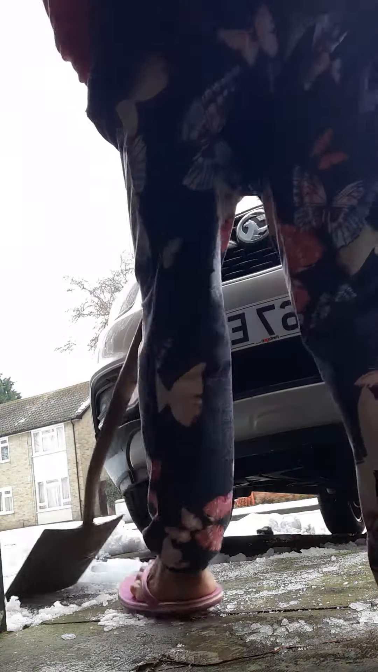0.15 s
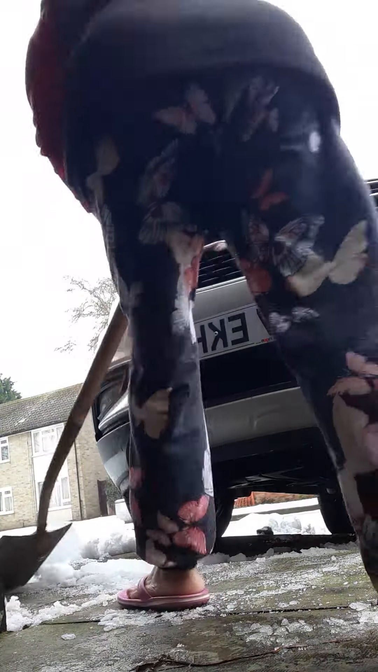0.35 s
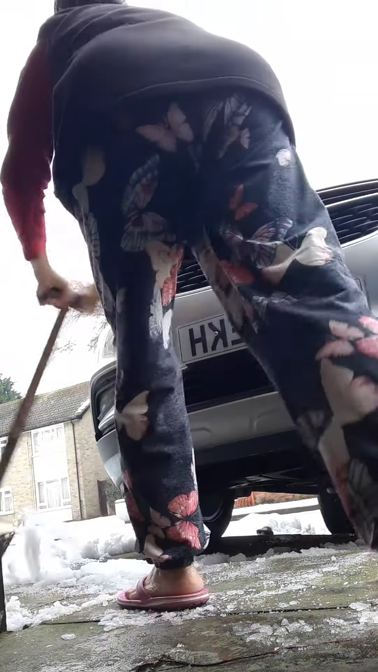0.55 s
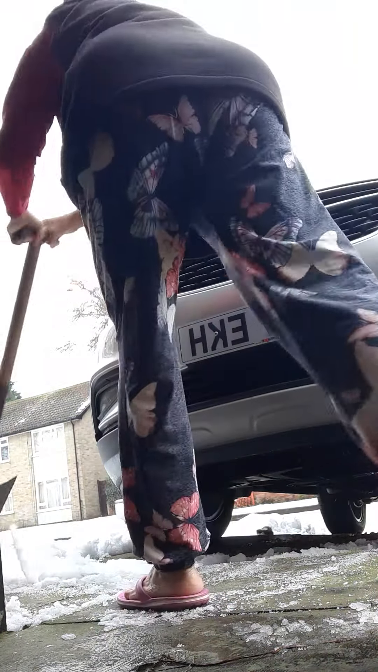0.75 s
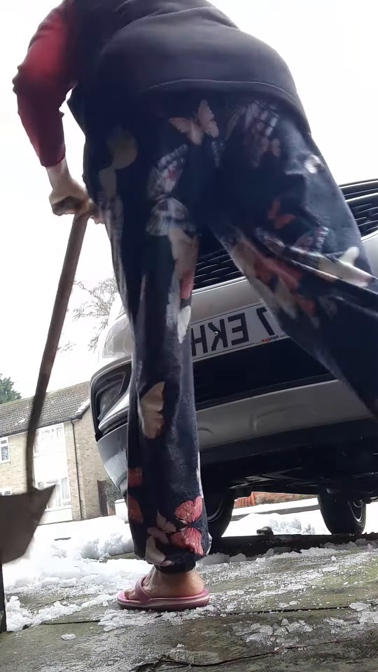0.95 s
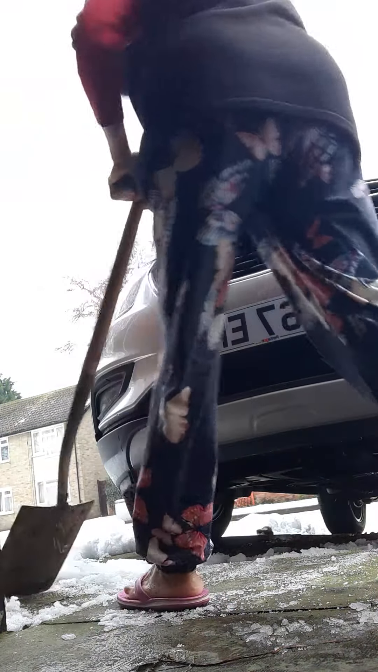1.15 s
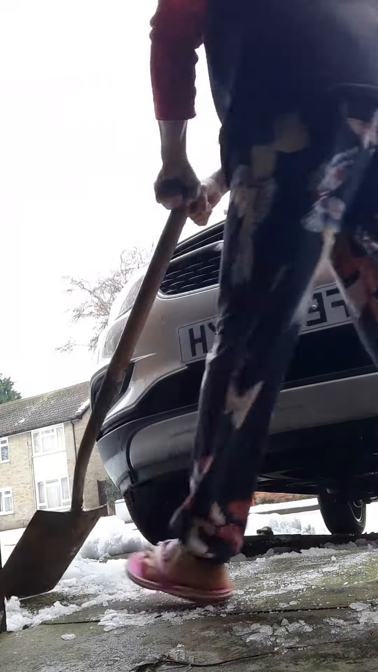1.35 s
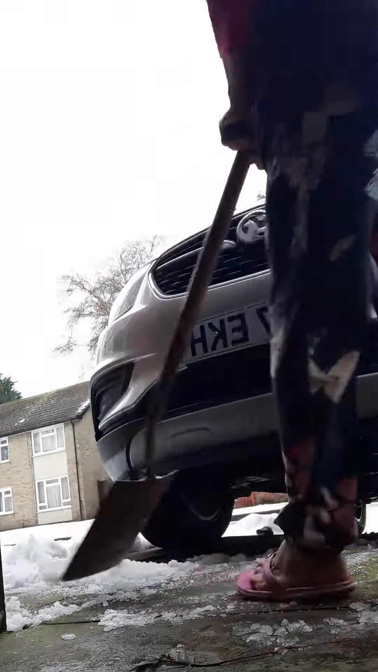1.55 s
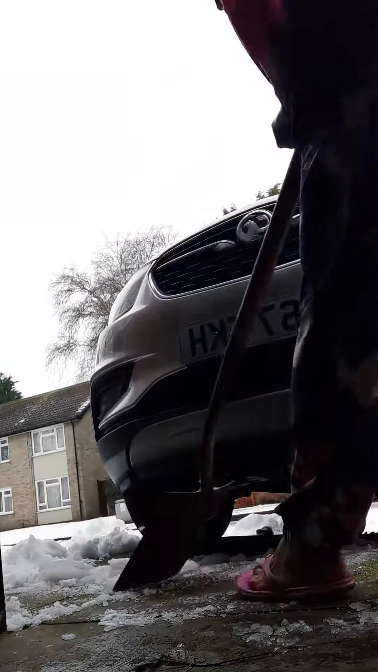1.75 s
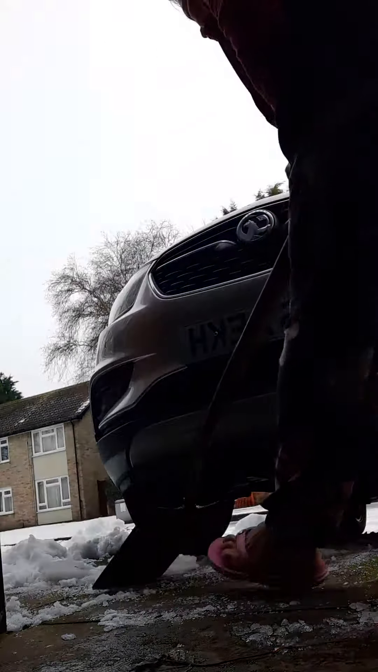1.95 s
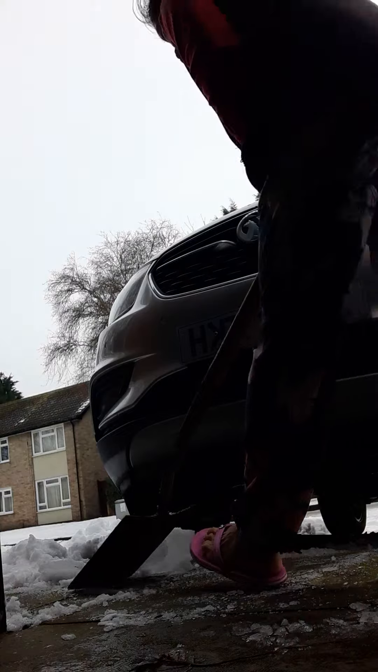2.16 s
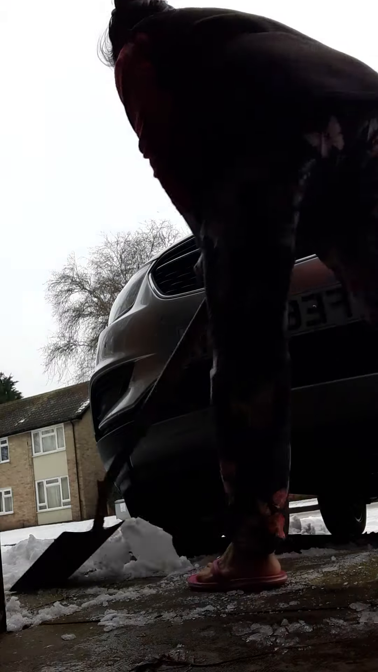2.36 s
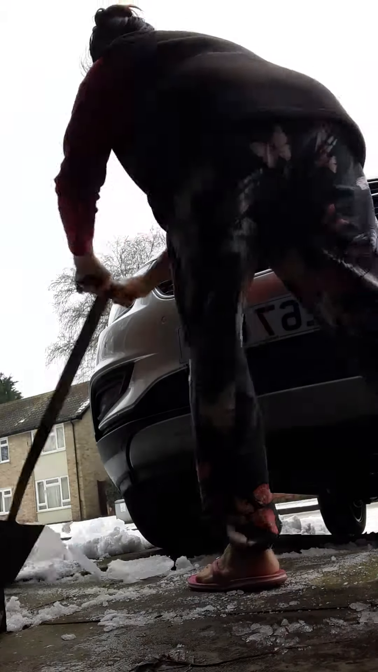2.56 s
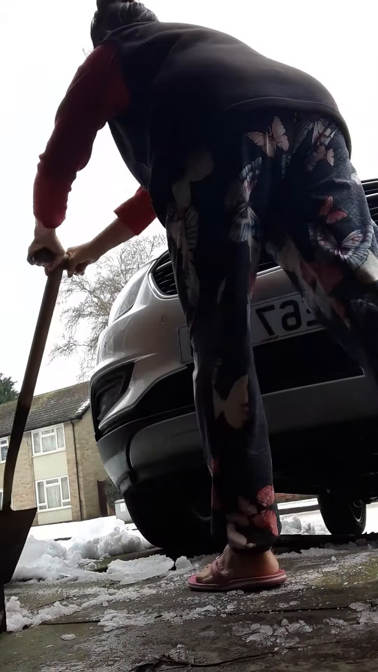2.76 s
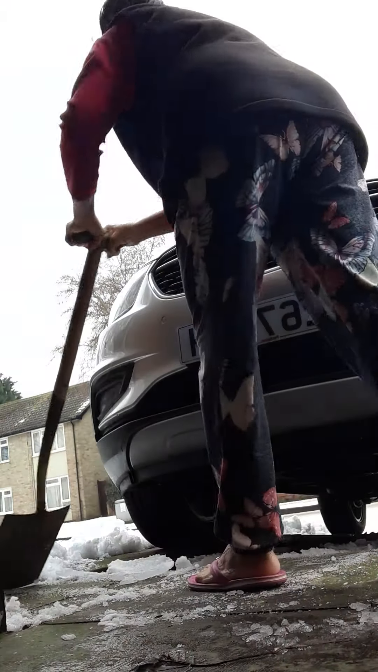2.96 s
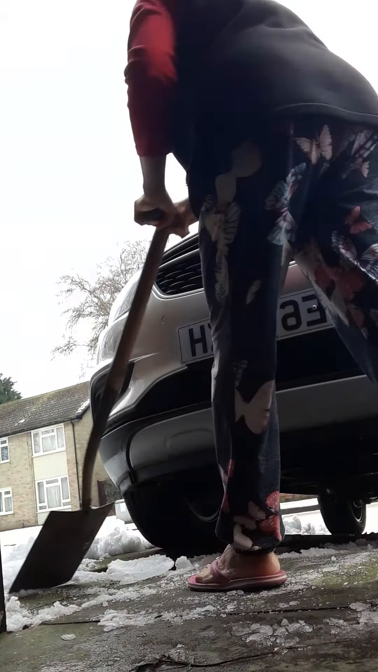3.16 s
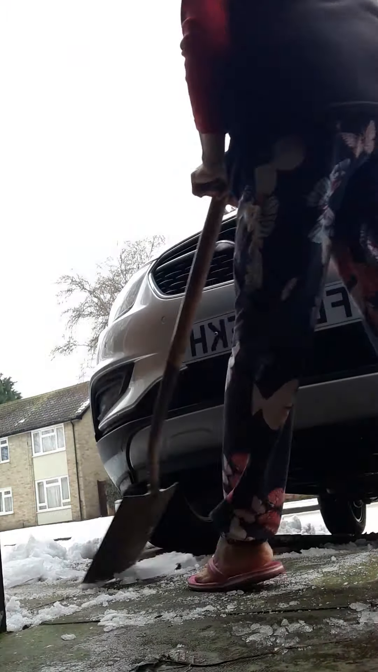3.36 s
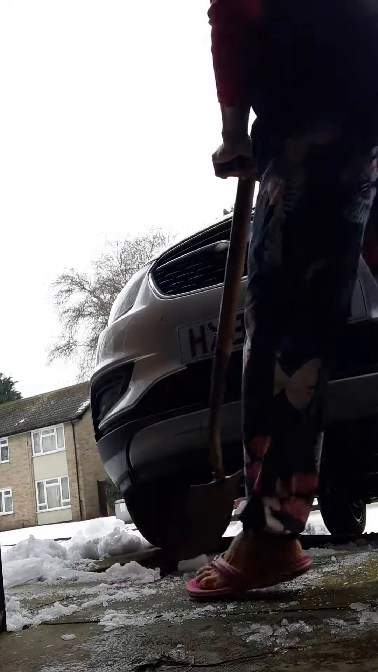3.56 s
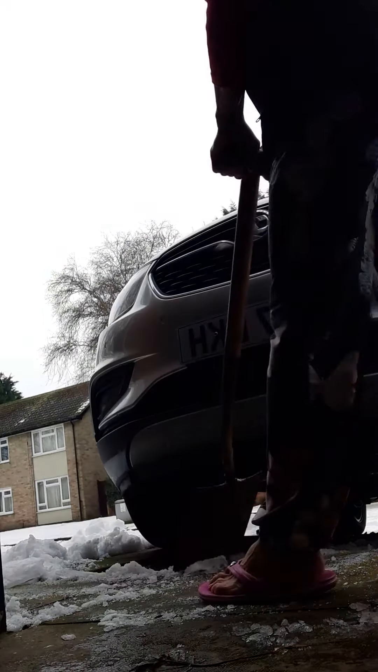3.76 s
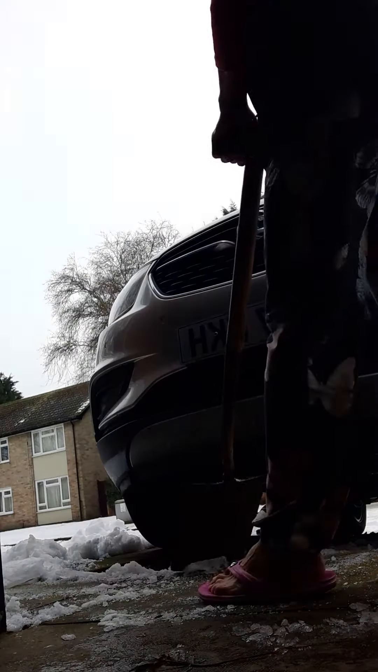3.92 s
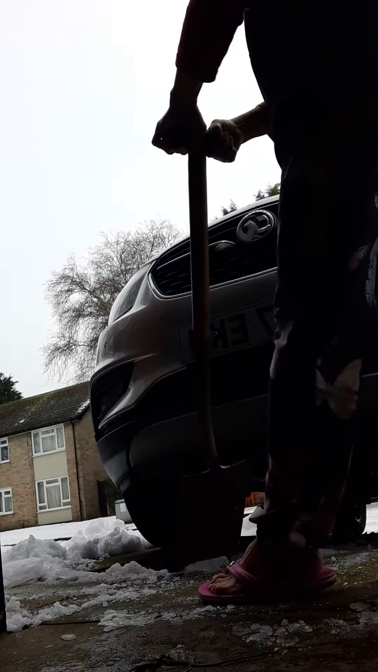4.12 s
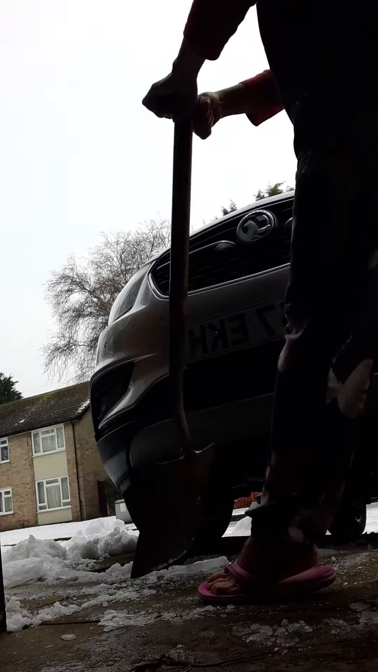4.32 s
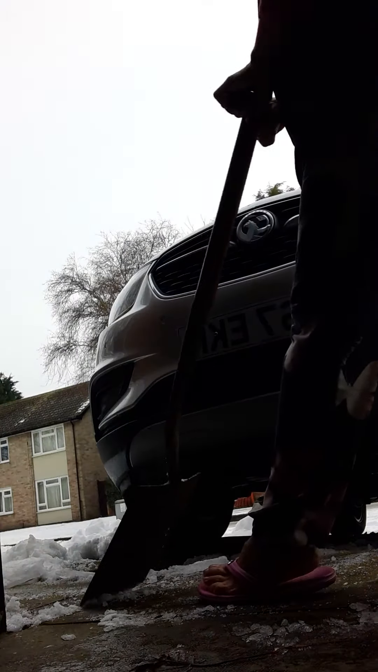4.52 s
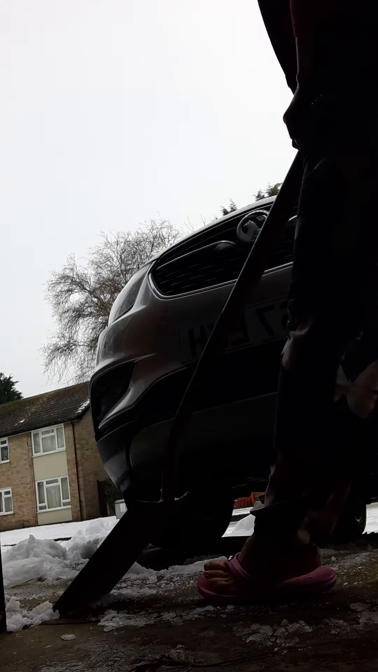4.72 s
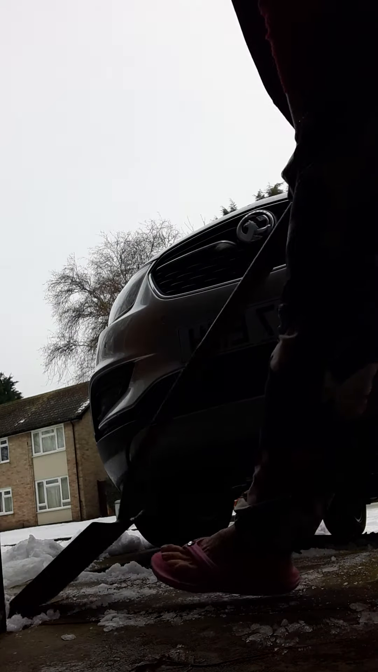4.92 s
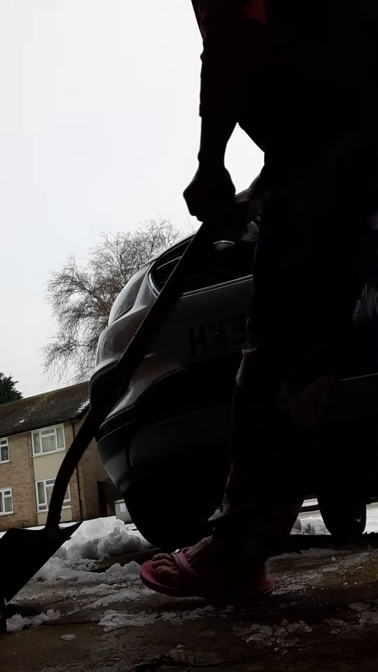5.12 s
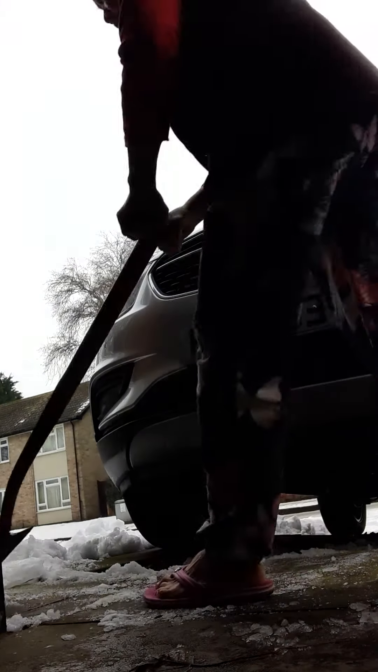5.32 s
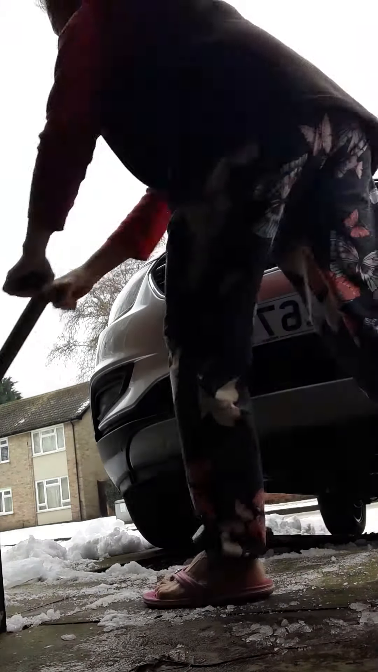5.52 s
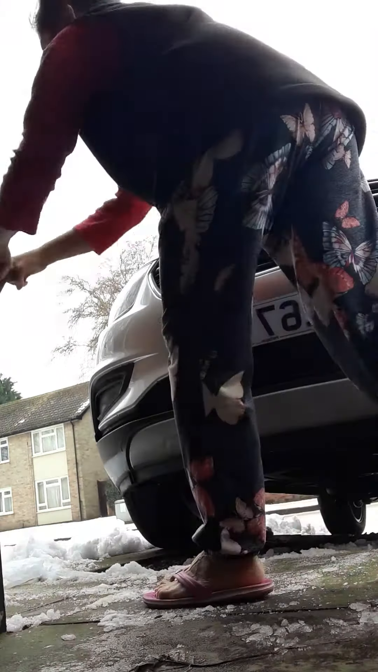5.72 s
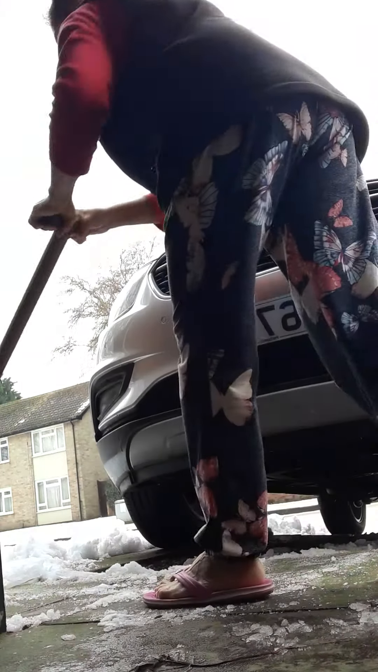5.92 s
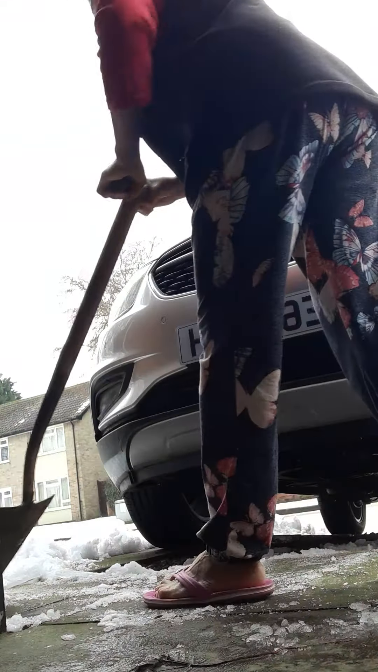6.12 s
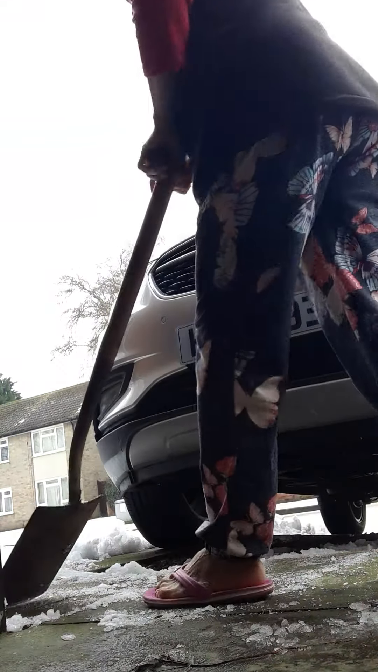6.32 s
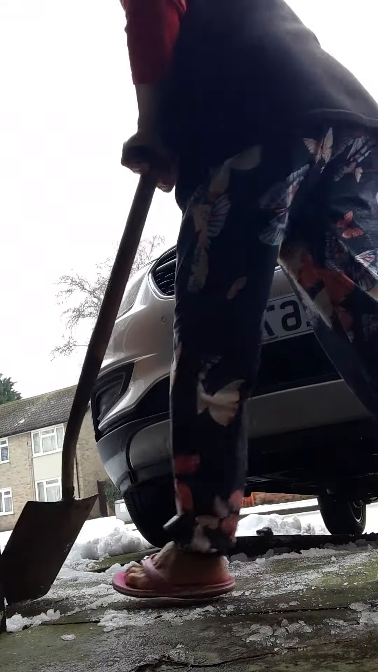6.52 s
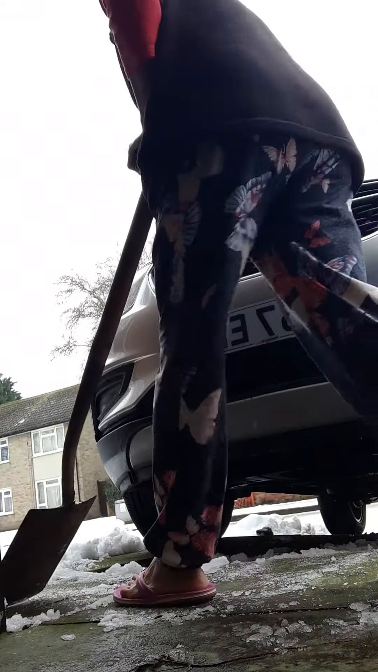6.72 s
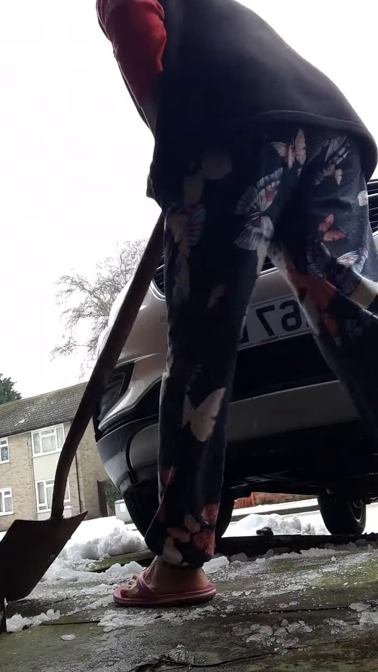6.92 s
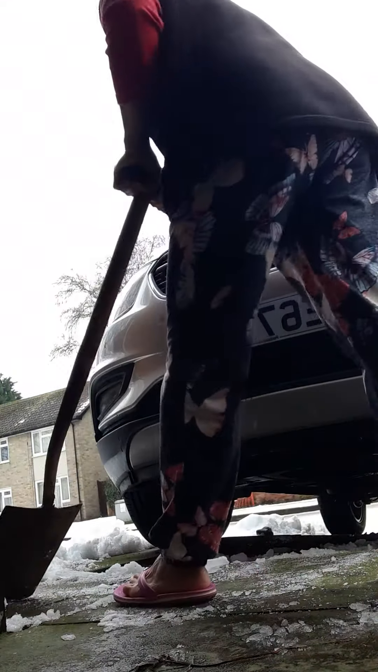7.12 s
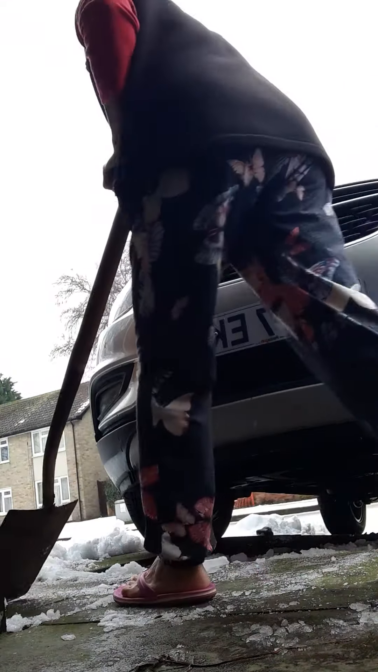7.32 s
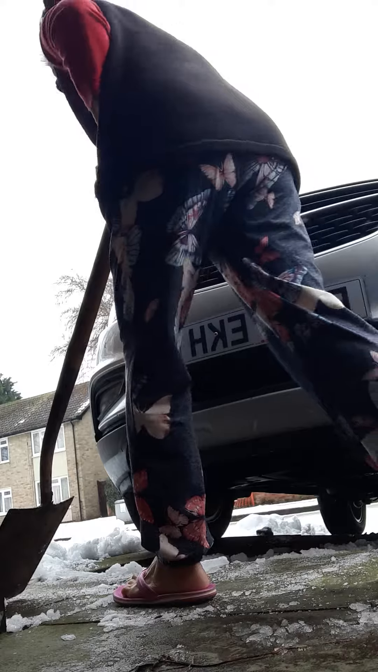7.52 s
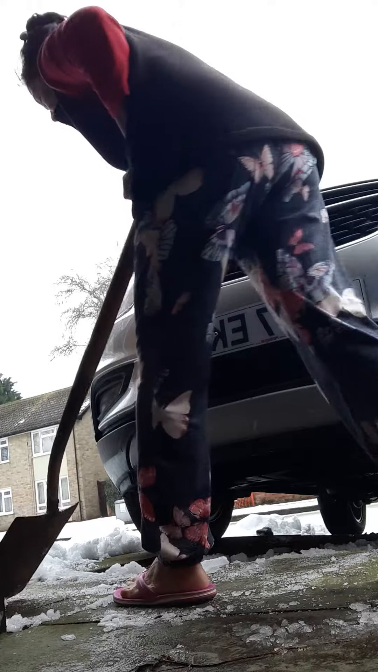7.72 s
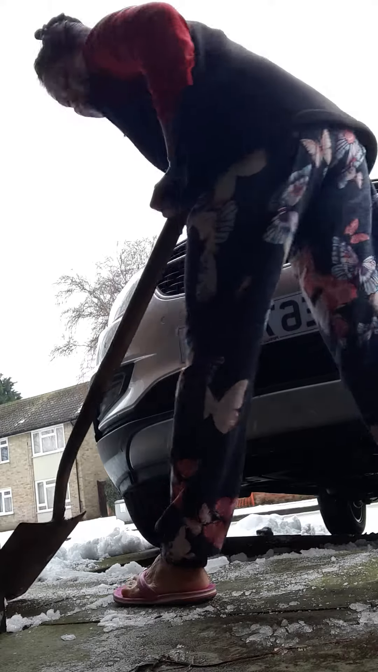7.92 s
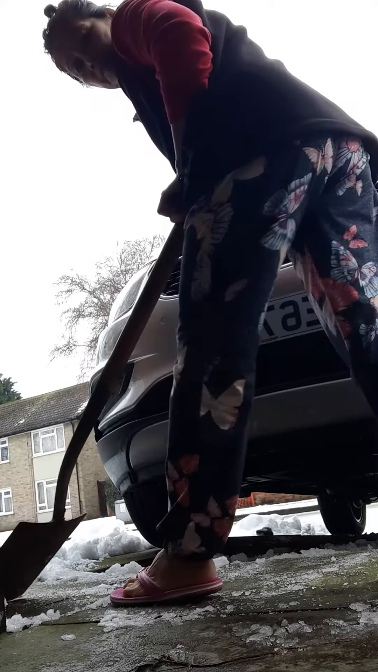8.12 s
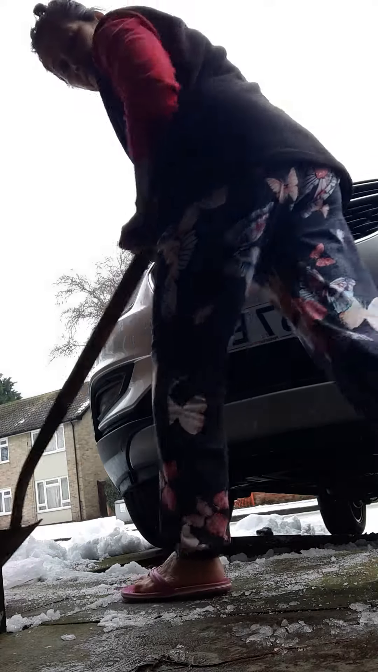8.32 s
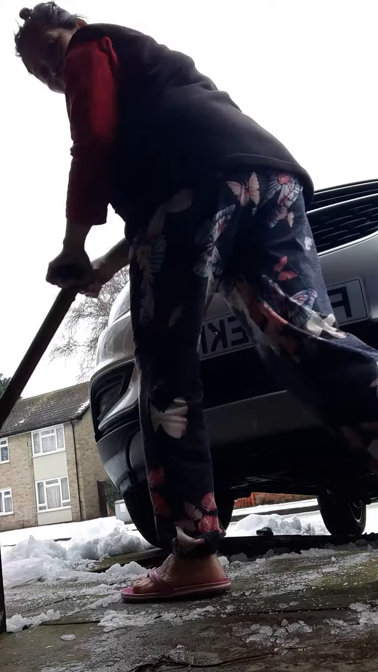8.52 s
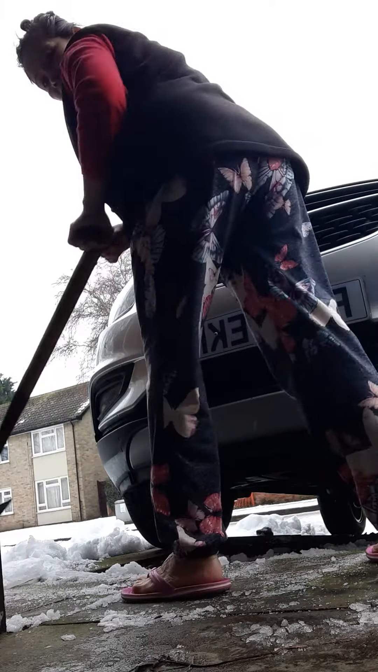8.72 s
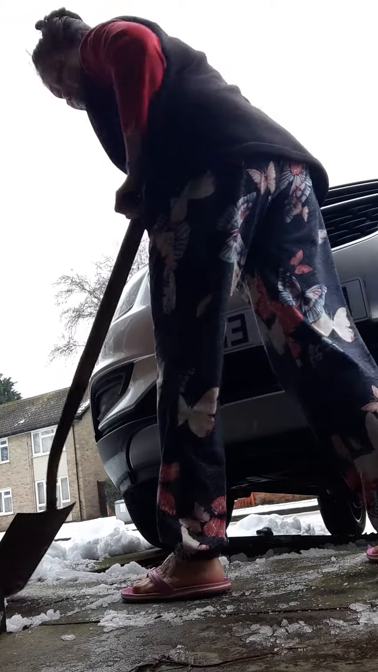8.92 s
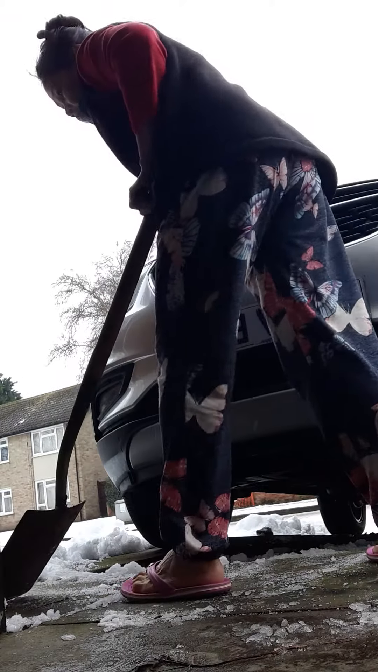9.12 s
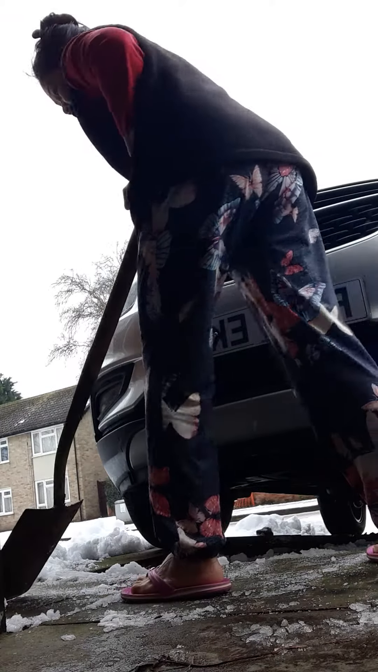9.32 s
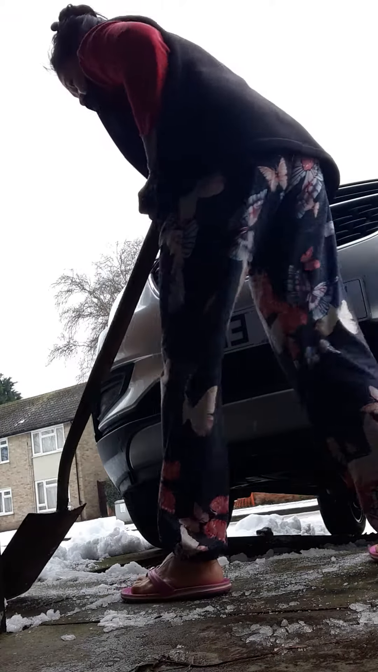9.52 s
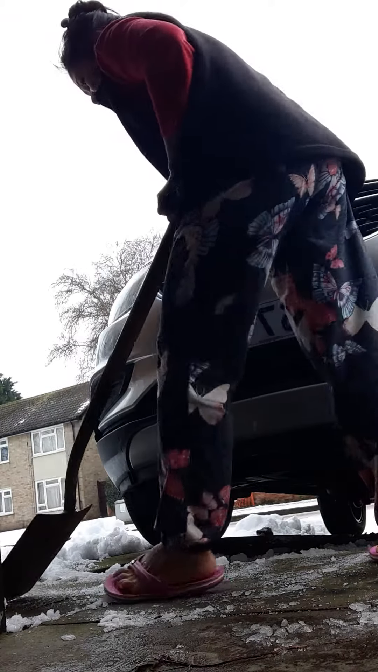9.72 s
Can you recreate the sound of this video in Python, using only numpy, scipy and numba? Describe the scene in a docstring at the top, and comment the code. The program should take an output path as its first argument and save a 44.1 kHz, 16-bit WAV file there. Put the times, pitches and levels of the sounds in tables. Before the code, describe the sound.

Close, gritty scrapes and sharp jabs of a metal spade break up ice on a driveway, the blade ringing briefly between strokes.

```python
"""Steel spade on icy concrete.

The spade scrapes close by, right of centre. Grit and breaking ice tick densely against the edge,
blows crack on top, and the blade rings on when lifted. Slabs of ice rumble.
Ground, car and walls give a short echo over a quiet street."""
import sys
import numpy as np
from scipy import signal
from scipy.fft import rfft, irfft, next_fast_len
from scipy.io import wavfile
from scipy.ndimage import uniform_filter1d, map_coordinates
from numba import njit

SR = 44100
rng = np.random.default_rng(int(sys.argv[2]) if len(sys.argv) > 2 else 0)


def inscribe(sig):
    """Save sig as 16-bit PCM at rate SR to the path in sys.argv[1].

    A 1-D sig is mono; a 2-D sig holds one channel per row.
    Samples are clipped to [-1, 1] before scaling.
    """
    pcm = np.round(np.clip(np.atleast_2d(sig).T, -1, 1) * 32767)
    wavfile.write(sys.argv[1], SR, pcm.astype(np.int16))


N = 435266
FFT_SIZE = next_fast_len(N + SR)
HZ = np.maximum(np.arange(FFT_SIZE // 2 + 1) * SR / FFT_SIZE, 1)
T = np.arange(N) / SR

# Event levels are relative, ahead of echo and colouring.
# Edge drags: start_s, length_s, edge_start_db, edge_end_db, body_re_edge_db, rumble_re_edge_db
SCRAPES = [(0.0, 0.51, -21, -14.5, -2.5, -11.5), (0.563, 0.037, -43, -39.5, 13, 4),
           (0.951, 0.02, -50.5, -47.5, 2, -1), (1.0498, 0.0045, -14.5, -19, 1.5, -3.5),
           (1.14, 0.048, -30.5, -35, 7, -10.5), (1.174, 0.064, -21.5, -27.5, -0.5, -10),
           (1.312, 0.021, -26, -39, -9, -12), (1.462, 0.173, -40, -34.5, -2.5, -14.5),
           (1.661, 0.013, -20, -23, 6, -11), (1.748, 0.0054, -28.5, -38.5, 0.5, 16.5),
           (1.809, 0.71, -19, -15, -4, -11), (2.673, 0.022, -37.5, -32, 2.5, -12.5),
           (2.805, 0.057, -42.5, -53.5, 5, 5), (2.888, 0.052, -46, -47.5, 9, -3),
           (2.95, 0.63, -28, -36, 0.5, -29), (3.27, 0.16, -17, -24, -4.5, -14.5),
           (3.46, 0.15, -16, -23.5, -2, -18.5), (3.79, 0.039, -55.5, -46, 11.5, 1),
           (3.819, 0.059, -47.5, -43, 11.5, 8), (3.895, 0.078, -28.5, -40, 6.5, 0.5),
           (4.121, 0.025, -62, -52, 14.5, 10.5), (4.445, 0.039, -23, -17.5, 1, -18),
           (4.53, 0.1, -34, -30.5, 1, -17), (4.669, 0.05, -25, -29.5, 2, -31),
           (4.687, 0.446, -16.5, -15, -5, -15), (5.174, 0.15, -26.5, -15, -0.5, -26),
           (5.365, 0.26, -32, -40.5, 10.5, 4.5), (5.874, 0.021, -60, -49, -9, -23),
           (6.066, 0.023, -16.5, -40, 8.5, 6.5), (6.24, 0.086, -25, -15, -0.5, -7.5),
           (6.379, 0.019, -22, -37, 2, -6), (6.449, 0.012, -30, -26, -4.5, -26),
           (6.524, 0.025, -29, -31.5, -32, -10.5), (6.613, 0.067, -50, -38, -23, -28),
           (6.669, 0.085, -28.5, -24, -8.5, -11.5), (6.784, 0.23, -23.5, -12.5, -6, -18),
           (7.04, 0.1, -38.5, -50, 10, 0), (7.1626, 0.027, -17.5, -24.5, 2.5, -16),
           (7.212, 0.047, -20, -21.5, -7, -19), (7.321, 0.042, -19, -24.5, -3.5, -16),
           (7.381, 0.076, -33.5, -29.5, -8.5, -8.5), (7.582, 0.034, -49, -36, -8, -9.5),
           (7.661, 0.04, -42, -44, -11, -19), (7.746, 0.133, -44, -48, -8, -27),
           (7.927, 0.065, -45, -34.5, 0, -22), (7.988, 0.046, -26, -25.5, -3, -37),
           (8.091, 0.13, -23, -16.5, -2.5, -36), (8.285, 0.21, -29.5, -33.5, 6, -6),
           (8.68, 0.047, -42, -35.5, 0, -19.5), (8.842, 0.03, -27.5, -34, 15, -19),
           (8.928, 0.078, -23, -17.5, -2, -18), (9.248, 0.041, -39, -32, -8.5, -1),
           (9.329, 0.032, -27, -48, -15, -8), (9.424, 0.064, -38.5, -49, -4.5, -10.5),
           (9.566, 0.089, -45, -20, 1, -27), (9.74, 0.18, -23.5, -8.5, -5.5, -29.5)]
# Edge catches on a lump: start_s, pitch_hz, level_db
KNOCKS = [(0.166, 319, 1.5), (0.181, 315, 4.5), (0.2214, 344, -2), (4.857, 300, -4.5), (6.95, 206, -6.5),
          (8.1705, 229, -7)]
# Blows on the ice: start_s, level_db, dull_re_level_db, clank_re_level_db
BLOWS = [(0.9946, -34, -4, -15), (1.05, -6, -10, -3.5), (1.1369, -9.5, 2, -18), (1.183, -8, -12, -5),
         (1.4627, -20.5, -27, -12), (1.6612, -6.5, -3, 0.5), (1.7424, -18, 1, 1), (1.7841, -5, -19.5, -3.5),
         (2.82, -43.5, 1, 2), (3.279, -6.5, -10, -16.5), (3.465, -9, -22, -14), (3.7906, -40, 8, -24),
         (3.8366, -22.5, -16, 1), (3.906, -18, -12, -8), (3.917, -15, -6, -4), (4.028, -32.5, -17, -8),
         (4.1425, -38.5, -1, 7), (4.4565, -5, -8.5, -12), (4.655, -6, -14.5, -9), (5.231, -7.5, -14, -21),
         (5.5641, -20.5, 11.5, 8), (5.661, -51, 0, 16), (6.0725, -18, 1, 7.5), (6.2478, -5, -8, -0.5),
         (6.29, -7, 0, -17), (6.4421, -12.5, -19, -12), (6.5404, -12, -15, -10), (6.687, -12.5, -9, -8),
         (6.795, -10, -24, -10), (6.9473, -12.5, 4, 2), (7.1583, -2.5, -21, -6.5), (7.3167, -6, -19, -17),
         (7.5756, -19.5, -19, -31), (7.986, -22.5, -19, 2.5), (8.077, -15, -20, -28),
         (8.146, -9.5, -3.5, 4), (8.55, -40.5, 0, 3), (8.695, -28, -28, -19), (8.8466, -10.5, 2, 4.5),
         (8.9499, -6.5, -20, -2), (9.097, -11.5, -6, -36), (9.2609, -11.5, -9, -8.5),
         (9.3573, -19.5, -0.5, -5.5), (9.5997, -17.5, -9, -11.5), (9.644, -12.5, -2.5, -3),
         (9.756, -21.5, -8, -20.5)]
# Ice slabs knocked, tipped or shoved: start_s, length_s, rumble_db
SLABS = [(1.654, 0.016, -23.5), (2.194, 0.26, -19), (3.508, 0.026, -23.5), (4.136, 0.033, -50),
         (4.468, 0.082, -36.5), (5.473, 0.041, -35), (6.063, 0.017, -27), (6.272, 0.036, -36),
         (7.154, .015, -36.5), (8.162, .01, -22.5), (8.418, 0.075, -28.5), (8.843, 0.087, -26.5),
         (9.652, 0.03, -41)]
# Free blade modes, one list each: pitch_hz, level_db, t60_s
BLADE_HZ = [115, 305, 708, 1110, 1190, 1288, 1380, 1640, 2140, 2300, 2570, 2910, 3300, 3595, 3940, 4500,
            4640, 4780, 5345, 5915, 6150, 6550, 6990, 7480, 7820, 8200, 8490, 8760]
BLADE_DB = [-14, -13, -1, -7.5, -7.5, -4, -10, -11.5, -15, -7.5, -10, -3.5, -19, -11, -6, -8, -17.5, -7.5,
            -2.5, -9, -3, -12, -8, -12.5, -3.5, -3.5, -6, -5.5]
BLADE_T60_S = [.15, .1, .8, .17, .15, .9, .12, .11, .1, .18, .2, .15, .2, .3, .15, .15, .14, .13, .12, .1,
               .1, .1, .1, .09, .09, .08, .08, .08]
# Modes that only a hard push holds: pitch_hz
LOOSE_HZ = [1110, 1640, 2300]
# Range of modes the contact excites most: time_s, centre_hz
SINGING = [(0.55, 2350), (0.7, 1260), (1.0, 2080), (1.6, 1203), (3.2, 1450), (4.6, 1550), (5.2, 2250),
           (5.63, 2300), (5.75, 3600), (6.1, 2130), (6.6, 1260), (7.5, 1210), (8.3, 2190), (9.0, 1600)]
# Spade spectrum at the microphones: freq_hz, level_db
COLOUR = [(24, -24), (40, -40.5), (109, -5), (158, -14.5), (303, -3.5), (513, -8.5), (800, -8.5),
          (1170, -3.5), (1540, 0), (2300, -1.5), (3200, -3), (4400, -3.5), (5530, -0.5), (7650, -3.5),
          (8800, -5), (9700, -12.5), (15800, -17)]
# Stereo balance: freq_hz, left_minus_right_db
SHADOW = [(60, -8), (110, -4), (200, -0.5), (380, -2), (700, -2), (1290, -3), (2380, -6), (4400, -8.5),
          (8120, -10), (15000, 2)]
# Street spectrum: freq_hz, level_db
STREET = [(24, -22), (48, 7.5), (319, 1), (1200, -20), (1500, -24), (3000, -34.5), (15800, -53.5)]

BITE_S = 0.01


def undb(db):
    """Decibels to gain."""
    return 10 ** (np.asarray(db) / 20)


def unit(x):
    """Scale to rms 1."""
    return x / np.sqrt(np.mean(np.abs(x) ** 2))


def minimum_phase(db):
    """Causal response with the given gain at HZ."""
    cepstrum = irfft(np.log(undb(db)), FFT_SIZE)
    cepstrum[1:FFT_SIZE // 2] *= 2
    cepstrum[FFT_SIZE // 2 + 1:] = 0
    return np.exp(rfft(cepstrum))


def curve_db(table):
    """Interpolate (freq_hz, db) points on a log-frequency axis."""
    hz, db = np.transpose(table)
    return np.interp(np.log(HZ), np.log(hz), db)


def walk(rate_hz):
    """Slewed random steps, spread near 1."""
    hold = int(SR / rate_hz)
    return 0.98 * uniform_filter1d(np.repeat(rng.standard_normal(N // hold + 1), hold), hold)[:N]


def scrapes(lift_db_per_s=428.5, free_s=0.0086, crumbs_db=-17.5, crumbs_db_per_s=38):
    """Each drag bites, holds, lets go and leaves crumbs settling, more after a long one."""
    power = np.full((3, N), 1e-10)  # edge, body, rumble
    pressure, held_power = np.zeros((2, N))
    for start_s, length_s, start_db, end_db, body_db, rumble_db in SCRAPES:
        i = int(start_s * SR)
        t = T[:min(int((length_s + 1) * SR), N - i)]
        span = slice(i, i + len(t))
        after_s = np.maximum(t - length_s, 0)
        struck = any(0 <= blow[0] - start_s < 0.0045 for blow in BLOWS)
        bite = np.minimum(t / (0.0015 if struck else BITE_S), 1)
        held = bite * undb(np.interp(t, [0, length_s], [start_db, end_db]) - lift_db_per_s * after_s)
        crumbs = (t > length_s) * length_s * undb(end_db + crumbs_db - crumbs_db_per_s * after_s) ** 2
        power[0, span] += held ** 2 + crumbs
        power[1, span] += (held ** 2 + crumbs) * undb(body_db) ** 2
        power[2, span] += (held * undb(rumble_db)) ** 2
        pressure[span] += held * np.exp(-after_s / free_s) + 0.13 * np.sqrt(crumbs)  # crumbs damp too
        held_power[span] += held ** 2
    touch_share = np.sqrt(held_power / power[0])
    return power, pressure, touch_share


def impulses(per_s, spread_db):
    """Random impulses, a few much larger than most."""
    return (rng.random(N) < per_s / SR) * undb(spread_db * rng.exponential(size=N))


def stick_slip_db(per_s, spread_db, fade_s):
    """The edge sticks, then lets go with a brief jerk."""
    jerks = signal.lfilter([1], [1, -np.exp(-1 / (fade_s * SR))], impulses(per_s, spread_db))
    return 20 * np.log10(unit(jerks) + 1)


def grit(per_s, spread_db, hiss):
    """Grains break under the edge, over fine rubbing hiss."""
    ticks = impulses(per_s, spread_db) * rng.choice([-1, 1], N)
    return unit(unit(ticks) + hiss * rng.standard_normal(N))


@njit
def ring(drive, hz, loss_per_sample):
    """One mode with varying pitch and damping."""
    out, state = np.empty(len(drive)), 0j
    for i in range(len(drive)):
        step_rad = 2 * np.pi * hz[i] / SR
        state = state * complex(np.cos(step_rad), np.sin(step_rad)) * (1 - loss_per_sample[i]) + drive[i]
        out[i] = state.imag
    return out


def blade(force, touch_share, clank, pressure, ring_db=-26.5, pressed_t60_s=0.1):
    """Steel modes: free when lifted, choked and bent off pitch when pressed."""
    centre_log_hz = np.log(np.interp(T, *np.transpose(SINGING)))
    out = 0
    for hz, db, t60_s in zip(BLADE_HZ, BLADE_DB, BLADE_T60_S):
        loose = hz in LOOSE_HZ
        full_hold_db = -27.5 if loose else -47
        contact = np.clip(pressure / undb(full_hold_db), 0, 1)
        nearness = np.exp(-((np.log(hz) - centre_log_hz) / 0.19) ** 2)
        # Long-ringing modes vary least with contact point, gain most from a free tap, are held most.
        favour_db = (1 - t60_s) * (3.14 * walk(6) + 7 * nearness)
        tap = clank * undb(14.6 * t60_s * (1 - contact))
        coupling = np.maximum(nearness ** 0.4, touch_share) if loose else touch_share
        rub = force * coupling * undb(-20 * t60_s * contact)
        ice_damping = contact / pressed_t60_s * (hz / 2100.0) ** 0.12
        loss_per_sample = np.log(1000) / SR * (1 / t60_s + ice_damping)
        bent_hz = hz * (1 + 0.023 * contact * walk(5))
        out += ring((tap + rub) * undb(db + ring_db + favour_db), bent_hz, loss_per_sample)
    return out


def ground_bounce(x, delay_ms=1.15, drift_ms=0.301, level_db=-7.5):
    """Add a path off the ground; its comb slides as the spade moves."""
    delay_samples = np.maximum(delay_ms + drift_ms * walk(2), 0) * SR / 1000
    return x + undb(level_db) * map_coordinates(x, [np.arange(N) - delay_samples], order=3)


def echo(t60_s, level_db):
    """Stereo impulse response: dense reflections off ground, car and walls."""
    t = T[:SR // 2]
    tail = rng.standard_normal((2, len(t))) * np.exp(-np.log(1000) * t / t60_s)
    tail *= np.minimum(t / 0.0021, 1)
    return undb(level_db) * tail / np.sqrt(np.sum(tail ** 2, axis=1, keepdims=True))


def edge_paths(crunch, steel, places=6):
    """Direct plus echo spectrum; grains break at shifting places, each with its own echoes."""
    slow = np.array([undb(6.5 * walk(6)) for _ in range(places)])
    fast = slow * np.array([undb(8.7 * walk(150)) for _ in range(places)])
    slow, fast = (weights / np.linalg.norm(weights, axis=0) for weights in (slow, fast))
    spectrum = undb(-5.0) * rfft(crunch + steel, FFT_SIZE)
    for source in crunch * fast + undb(-8.5) * steel * slow:
        response = echo(t60_s=0.039, level_db=3.0) + echo(t60_s=0.14, level_db=-2.5)
        spectrum = spectrum + rfft(source, FFT_SIZE) * rfft(response, FFT_SIZE)
    return spectrum


def street(level_db=-54.5):
    """Distant traffic and air, gently swelling; narrower in the bass."""
    mid, side = rfft(rng.standard_normal((2, FFT_SIZE)))
    width = np.clip(HZ / 1500.0, 0.4, 1) * np.array([[1], [-1]])
    air = irfft(undb(curve_db(STREET)) * (mid + width * side), FFT_SIZE)[:, :N]
    return unit(air) * undb(level_db + 1.6 * walk(3.1) + np.array([[-1.5], [1.5]]))


def knocks():
    """The edge catches on lumps: one low sine cycle each."""
    out = np.zeros(N)
    for start_s, hz, db in KNOCKS:
        out -= undb(db) * np.sin(2 * np.pi * np.clip((T - start_s) * hz, 0, 1))
    return out


def blows(rise_s=0.00099, t60_s=0.052, crack_db=7.5, crack_s=0.0012, crest_db=9.0, push_db=24.5):
    """Ice cracks, then crunches: bright and dull envelopes, plus impulses into the steel."""
    bright, dull, clank = np.zeros((3, N))
    for start_s, db, dull_db, clank_db in BLOWS:
        i = int(start_s * SR)
        t = T[:min(SR // 3, N - i)]
        crack = undb(crack_db) * np.exp(-t / crack_s)
        crunch = np.exp(-np.log(1000) * t / t60_s)
        envelope = undb(db - crest_db) * np.minimum(t / rise_s, 1) * (crack + crunch)
        bright[i:i + len(t)] += envelope
        dull[i:i + len(t)] += envelope * undb(dull_db)
        clank[i] += undb(db + clank_db + push_db)
    return bright, dull, clank


def slabs(fall_db_per_s=301):
    """Rumble power of shifting ice slabs."""
    power = np.zeros(N)
    for start_s, length_s, db in SLABS:
        rise = np.clip((T - start_s) / BITE_S, 0, 1)
        after_s = np.maximum(T - start_s - length_s, 0)
        power += (rise * undb(db - fall_db_per_s * after_s)) ** 2
    return power


def spade(body_hz=600, edge_hz=3200, left_lag_samples=6):
    """Grit drives body and edge and, with the blows, rings the blade; lumps rumble through the ground."""
    bright, dull, clank = blows()
    (edge_power, body_power, rumble_power), pressure, touch_share = scrapes()
    edge_db, body_db, rumble_db = 10 * np.log10([edge_power, body_power, rumble_power + slabs()])
    judder_db = 1.43 * walk(45) + 0.77 * walk(140)  # uneven ground
    edge_db += stick_slip_db(per_s=160, spread_db=3.5, fade_s=0.0012) - 4.5
    colour_db, pan_db = curve_db(COLOUR), curve_db(SHADOW) / 2
    low = 1 / (1 + 1j * HZ / body_hz) ** 2
    high = 1 / (1 - 1j * edge_hz / HZ) ** 2

    def crush(grains, band, level_db, blow, flicker_db):
        """One band's spectrum of grains pressed by stroke and blow."""
        stroke = undb(level_db + judder_db + flicker_db * walk(30))
        band_rms = np.sqrt(np.mean(np.abs(band * undb(colour_db)) ** 2))
        return rfft(grains * np.hypot(stroke, blow), FFT_SIZE) * band / band_rms

    fine = grit(per_s=2500, spread_db=2.5, hiss=0.99)
    body = irfft(crush(fine, 1 - low - high, body_db, dull, flicker_db=2.1), FFT_SIZE)[:N]
    edge = irfft(crush(fine, high, edge_db, bright, flicker_db=0.99), FFT_SIZE)[:N]
    common, left, right = (grit(per_s=450, spread_db=0.5, hiss=0.9) for _ in range(3))
    lumps = (common + 1.24 * np.array([left, right])) * undb([[-4.0], [2.5]])
    rumble = crush(lumps, low, rumble_db, dull * undb(-10.0), flicker_db=2.56)
    steel = blade(body + edge, touch_share, clank, pressure)
    ice = grit(per_s=260, spread_db=1.6, hiss=0)
    snaps = crush(ice, 1 - low, edge_db, bright, flicker_db=2.1) * undb(-4.5)  # close by, no echo
    spectrum = edge_paths(body + ground_bounce(edge), steel) + rumble + snaps + rfft(knocks(), FFT_SIZE)
    lag = np.exp(-2j * np.pi * HZ * left_lag_samples / SR)
    microphones = np.array([lag * minimum_phase(colour_db + pan_db), minimum_phase(colour_db - pan_db)])
    return undb(-4.5) * irfft(spectrum * microphones, FFT_SIZE)[:, :N]


def scene():
    """Spade over the street."""
    return spade() + street()


def record(dry):
    """Bass cut, soft clip, treble cut."""
    bottom_hz, top_hz = 55, 16900
    highpass = signal.butter(2, bottom_hz, "high", fs=SR, output="sos")
    lowpass = signal.cheby2(16, 95, top_hz, fs=SR, output="sos")
    rounded = np.tanh(1.001 * signal.sosfilt(highpass, dry)) / 1.272
    return signal.sosfilt(lowpass, rounded)


dry = scene()
out = record(dry)
inscribe(out)
```